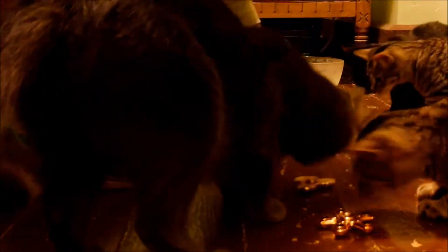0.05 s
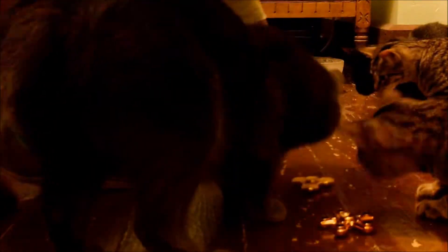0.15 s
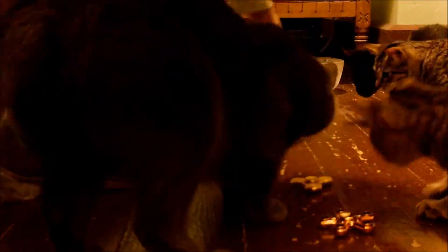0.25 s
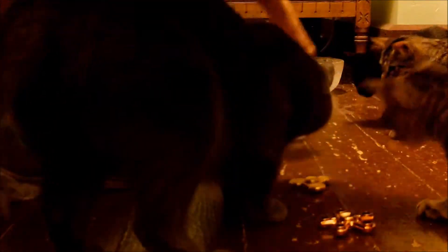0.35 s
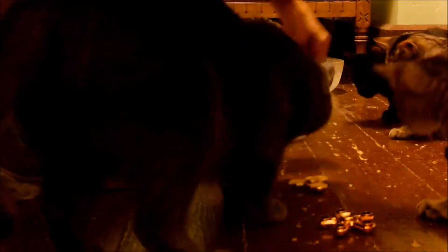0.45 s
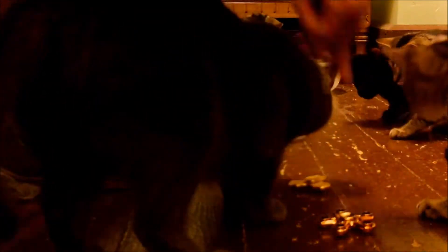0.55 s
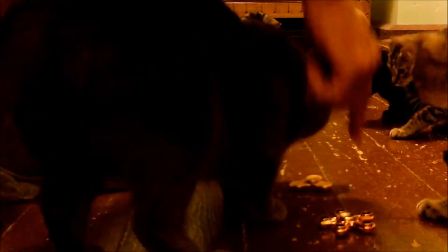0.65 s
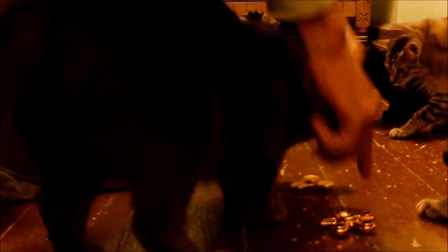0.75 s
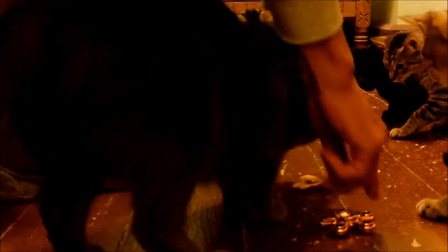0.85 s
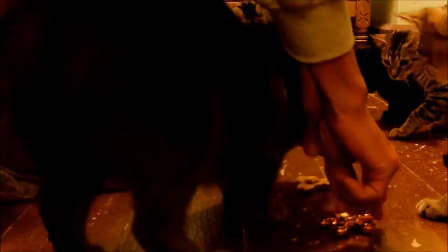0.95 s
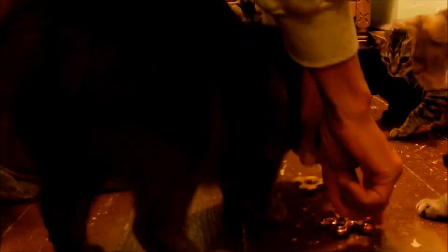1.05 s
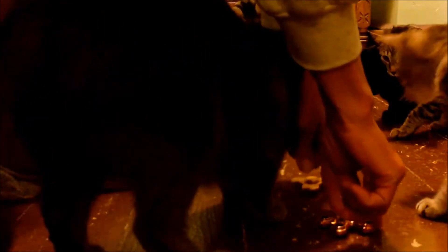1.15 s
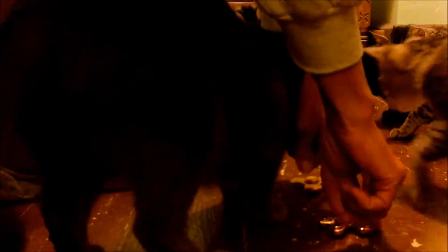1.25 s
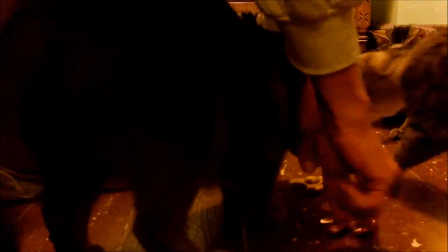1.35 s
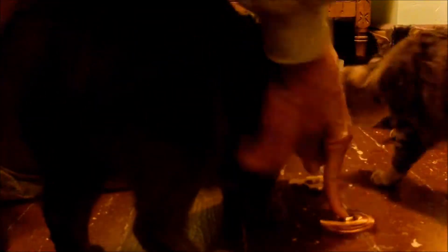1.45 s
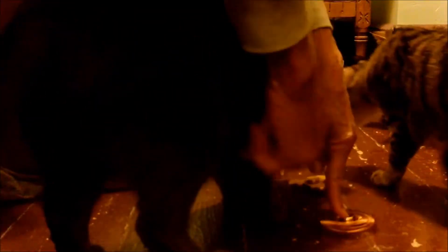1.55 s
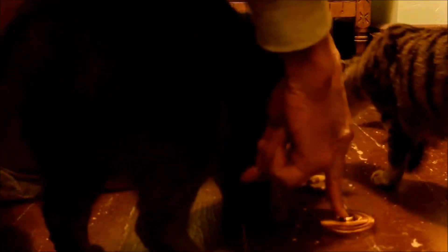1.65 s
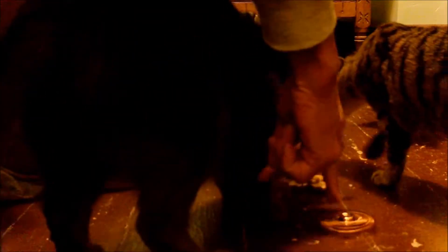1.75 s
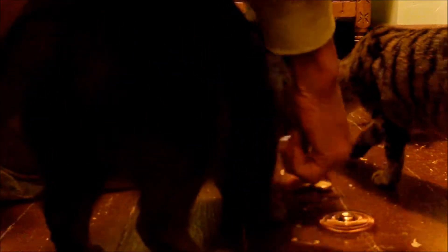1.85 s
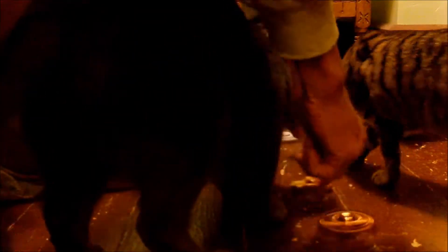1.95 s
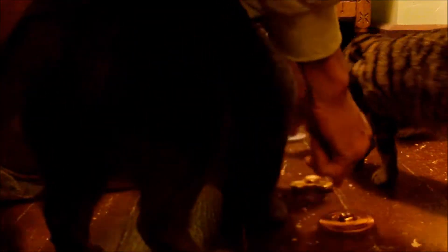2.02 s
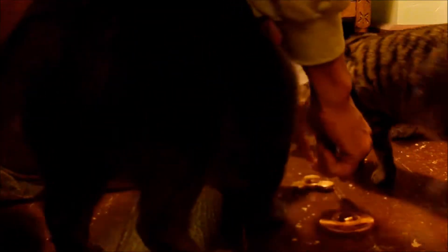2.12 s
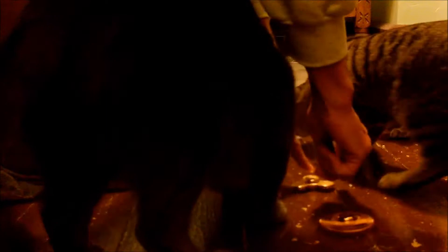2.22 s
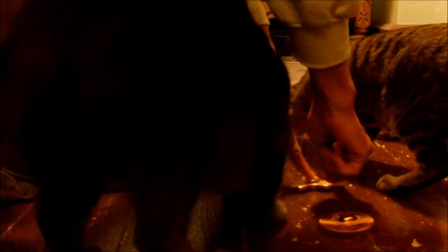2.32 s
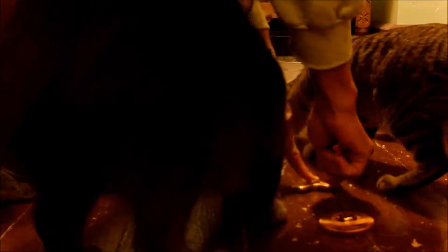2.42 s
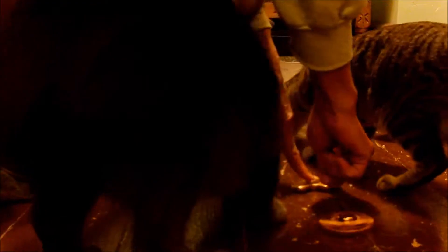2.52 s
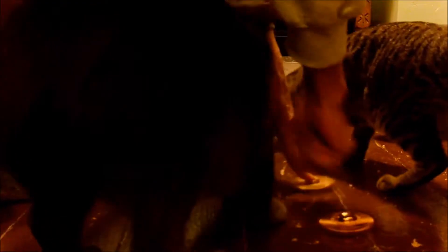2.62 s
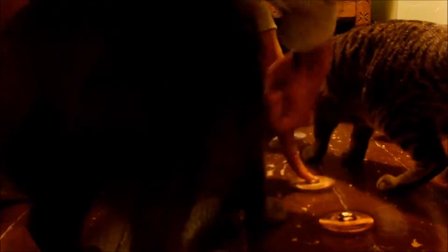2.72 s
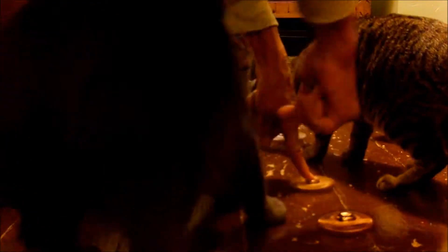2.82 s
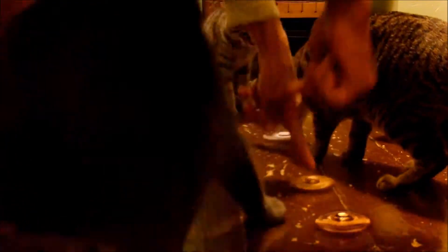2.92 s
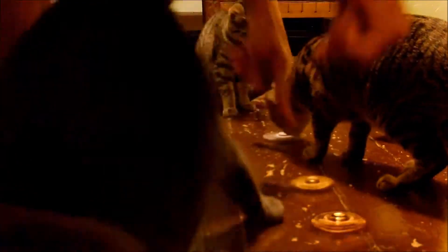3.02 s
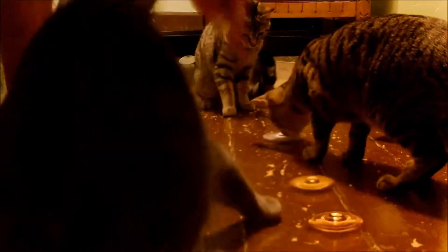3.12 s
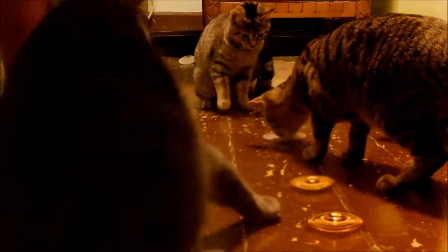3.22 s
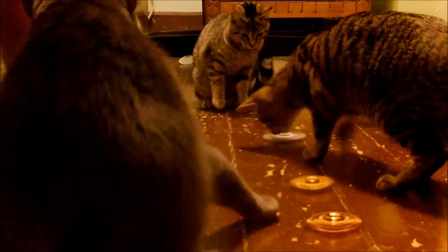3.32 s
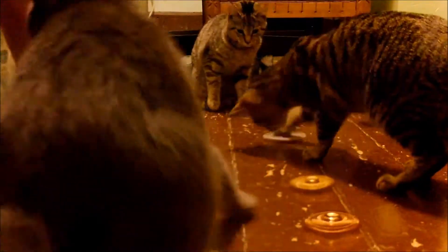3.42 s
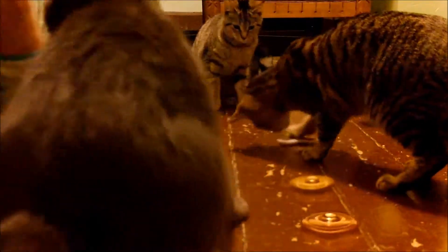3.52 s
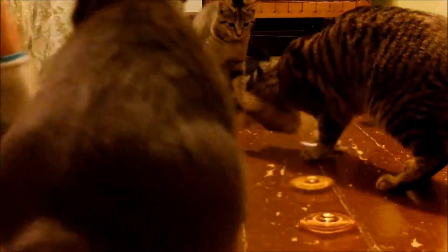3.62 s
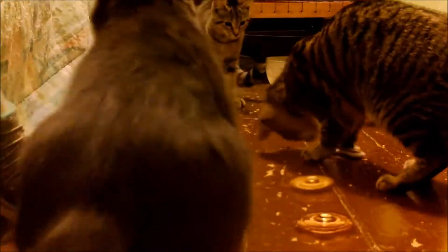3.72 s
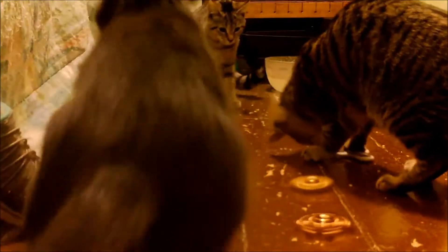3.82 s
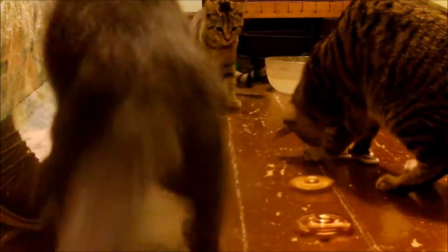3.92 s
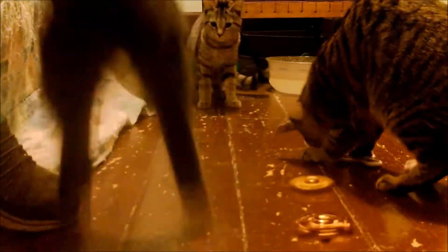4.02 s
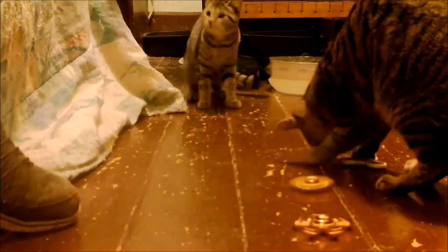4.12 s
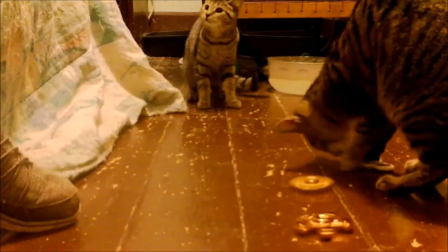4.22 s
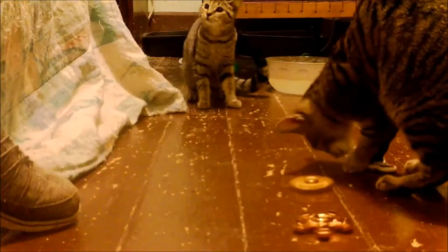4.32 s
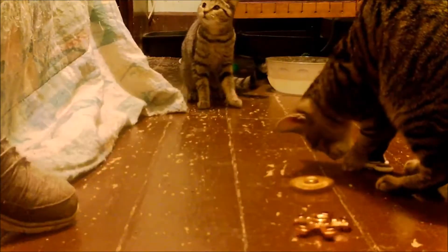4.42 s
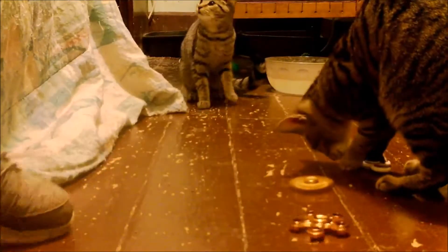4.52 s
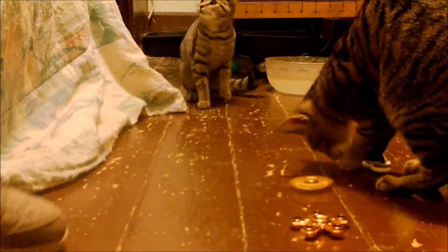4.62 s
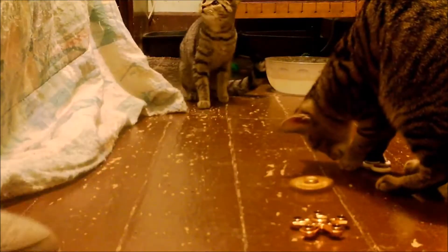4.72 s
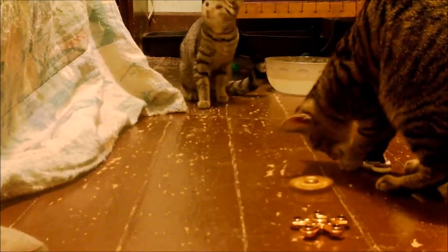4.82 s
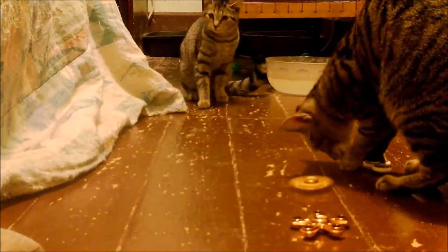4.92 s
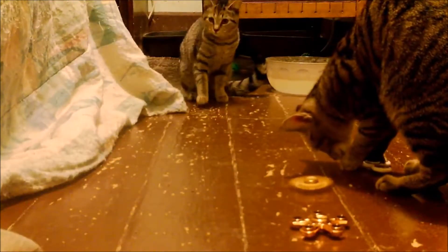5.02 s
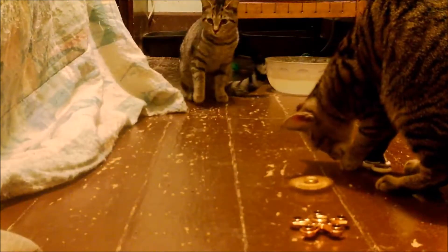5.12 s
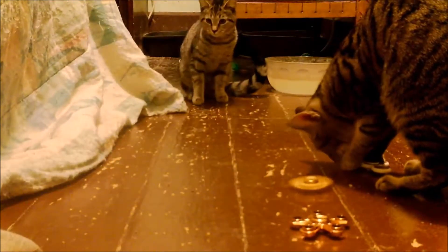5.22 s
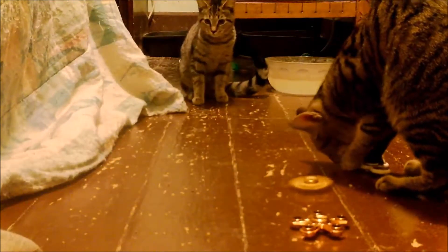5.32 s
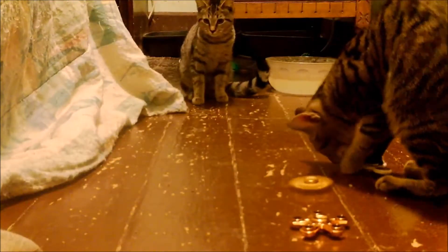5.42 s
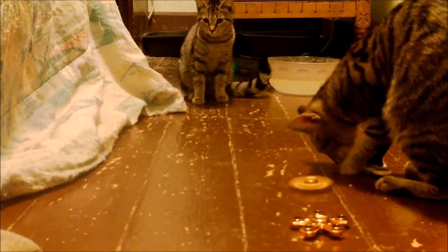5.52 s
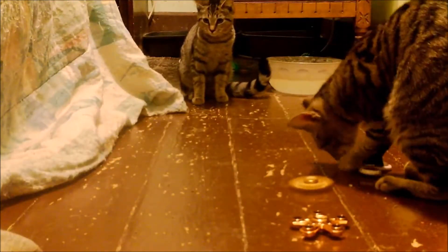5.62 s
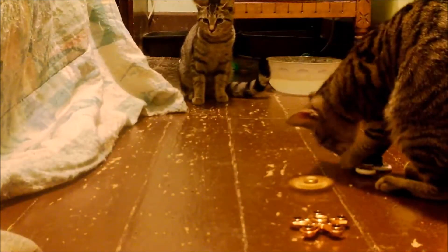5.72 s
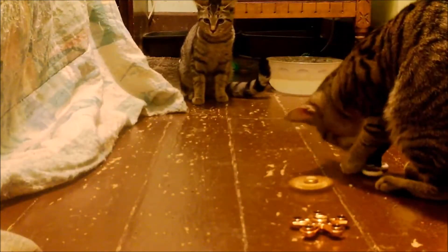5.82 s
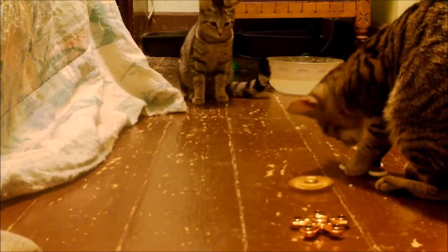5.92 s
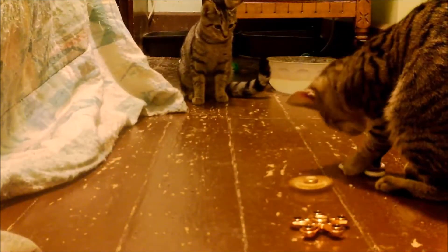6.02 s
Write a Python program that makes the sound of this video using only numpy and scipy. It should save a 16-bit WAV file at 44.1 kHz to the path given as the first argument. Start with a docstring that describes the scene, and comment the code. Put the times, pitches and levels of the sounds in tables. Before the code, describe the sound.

Close to a wooden floor in a small room, a light metal spinner hisses smoothly. A second is flicked with small knocks, a brief finger rub and a fluttering rattle. A third starts with a rough grind under a finger, then whirs strongly. A cat bats it: a hard clack, soft thump and skittering ticks. The throbbing whir continues with a few claw clicks over faint hum.

```python
"""Three metal fidget spinners whir on a wooden floor, each a stream of bearing impacts filtered by resonances.
One turns from the start; a second is flicked, rubbed by a fingertip, rattles into the boards and calms.
A third is launched under a pressing finger; its imbalance modulates the contacts, so its whir throbs.
A cat then knocks it: a sharp clack of struck modes, a thump, and a skitter of scraped and ticking metal.
Claw clicks follow; blows on the floor recur, and a low mains hum and a faint rumble lie under everything."""
import sys
import numpy as np
from scipy import signal
from scipy.fft import rfft, irfft
from scipy.io import wavfile
from scipy.ndimage import uniform_filter1d, minimum_filter1d

SR = 44100
rng = np.random.default_rng(int(sys.argv[2]) if len(sys.argv) > 2 else 0)


def unload_audio(sound):
    """Save the sound as a 16-bit wav file, at the path given as the first command line argument."""
    columns = np.transpose(np.atleast_2d(sound))
    # keep every value between -1 and 1, then stretch to whole-number steps
    steps = np.round(np.clip(columns, -1, 1) * 32767)
    wavfile.write(sys.argv[1], SR, steps.astype(np.int16))


N = 267246
TIME = np.arange(N) / SR  # s
TAPS = 4096  # length of a filter or short sound, samples
FREQS = np.arange(TAPS // 2 + 1) * SR / TAPS  # Hz

# spectra that the bearings feed into the boards
# [f/Hz, near spinner relative level/dB, wobbling spinner relative level/dB, pressed cap relative level/dB]
BEARING_SPECTRA = [(130, -15.5, -31, -32), (267, -8, -32.5, -23), (492, 0, -24, -8.5),
                   (777, -16.5, -13, -10.5), (891, -10.5, -17.5, -11), (1250, -3, 0, -8.5),
                   (2144, -0.5, 0, 1), (2910, -6, -9.5, 1), (3990, -12, -20, -12), (5540, -31, -36.5, -24),
                   (6930, -35.5, -61, -55), (10100, -15, -26.5, -15), (12030, -21.5, -23.5, -24),
                   (15400, -32.5, -47.5, -45)]
# the cat's blow: arm and cap slap the floor in turn as the spinner rocks
# [t/s, peak level/dB, contact cut-off f/Hz]
CLACK_BLOWS = [(3.3426, 0, 3380), (3.3446, 0.5, 3450), (3.3483, -7.5, 4200), (3.3493, 0.5, 5500),
               (3.3556, -6.5, 4200), (3.3584, -11, 4200), (3.3604, -6, 4200), (3.363, -9, 4200),
               (3.37, -15, 4200), (3.374, -13, 4200)]
LAUNCH_S = 2.495  # the wobbling spinner is launched


def undb(db):
    """Level: decibels to amplitude gain."""
    return 10 ** (np.asarray(db) / 20)


def unit(x):
    """Normalization: scale to rms 1."""
    return x / np.sqrt(np.mean(x ** 2))


def colour(table, order=1):
    """Spectral envelope: one dB column of a table, interpolated over log frequency."""
    columns = np.transpose(table)
    return np.interp(np.log(FREQS + 1), np.log(columns[0]), columns[order])


def resonances(modes):
    """Modal superposition: Lorentzian power peaks added to a flat response, in dB."""
    power = sum(undb(db) ** 2 / (1 + (2 * (FREQS - hz) / width) ** 2) for hz, width, db in modes)
    return 10 * np.log10(1 + power)


def response(db):
    """Minimum phase: the causal impulse response with this dB shape, by the folded cepstrum."""
    cepstrum = irfft(np.log(undb(db)))
    cepstrum[1:TAPS // 2] *= 2
    cepstrum[TAPS // 2 + 1:] = 0
    return irfft(np.exp(rfft(cepstrum)))


def through(x, ir):
    """Linear filtering: convolve x with an impulse response."""
    return signal.fftconvolve(x, ir)[:N]


def add(out, s, sound):
    """Superposition: mix a short sound in at time s."""
    i = max(int(s * SR), 0)
    out[i:i + len(sound)] += sound[:N - i]


def walk(rate):
    """Band-limited fluctuation: smoothed random steps, rate per second, with a spread near 1."""
    k = max(int(SR / rate), 2)
    steps = np.repeat(rng.standard_normal(N // k + 1), k)
    return 1.12 * uniform_filter1d(steps, k)[:N]


def swell(start_s, rise_s, hold_s, fall_db_per_s):
    """Envelope: a gain that rises to 1, holds and then decays exponentially (evenly in dB)."""
    t = TIME - start_s
    fall_db = abs(fall_db_per_s) * np.maximum(t - rise_s - hold_s, 0)
    return np.clip(t / rise_s, 0, 1) * undb(-fall_db)


def contacts(per_second, spread_db, flutter_db):
    """Shot noise: tiny impacts of uneven size that bunch together as the balls jostle in their race."""
    hits = (rng.random(N) < per_second / SR) * np.sign(rng.standard_normal(N))
    sizes = undb(abs(spread_db) * np.clip(rng.standard_normal(N), -2, 2))
    return hits * sizes * undb(flutter_db * walk(110))


def boards():
    """Plate modes: the floorboard resonances as a dB shape."""
    # [f/Hz, width/Hz, level above the broad response/dB]
    board_modes = [(279, 23, 10), (362, 43, 15), (470, 28.4, 18), (504, 14, 12), (761, 64.6, 18.5),
                   (954, 24, 13), (1258, 147, 11.5), (1388, 18, 13), (1444, 17, 13), (1505, 25, 3.5),
                   (1637, 16, 12), (1745, 42, 8), (1883, 45, 12), (1987, 16, 11), (2064, 29, 9),
                   (2260, 67, 11.5), (2333, 95, 7), (2390, 79, 9), (2790, 135, 8), (2949, 44, 16.5),
                   (3050, 44, 11), (3380, 120, 7.5)]
    return resonances(board_modes)


def bend(ring, lag_s):
    """Dispersion: bending waves in wood travel faster the higher they are; lag_s is the delay at 4 kHz."""
    travel = 2 * lag_s * np.sqrt(4000 * FREQS)  # phase lag, turns
    return irfft(rfft(ring) * np.exp(-2j * np.pi * travel))


def strike(blows, body_db, lag_s):
    """Impact excitation: each blow rings and disperses in the boards; a softer contact loses its treble."""
    out = np.zeros(N)
    for s, db, cut_hz in blows:
        contact_db = -10 * np.log10(1 + (FREQS / cut_hz) ** 4)
        ring = bend(response(body_db + contact_db), lag_s)
        add(out, s - lag_s, undb(db) * ring / np.abs(ring).max())
    return out


def wobbling_spinner(rise_s=0.0097):
    """Unbalanced rotor: each wobble loads the bearing once and friction slows it; roughness fades."""
    free_run_db, rough_start_db = -31.5, -29.5
    let_go_s, rough_hold_s, settling_db_per_s = 0.4, 0.6, 9
    # throb rate at the moment heavy_down_s when the heavy side is down, and its loss to friction
    throb_hz, heavy_down_s, slowing_hz_per_s = 13.21, 5.025, .14
    wander_turns = .045  # how far each wobble strays from even timing
    # a board resonance that the wobble hardly loads: there most of the power stays even
    even_hz, even_octaves, even_share = 1310, .3, .8
    # how far it wobbles [t/s, throb depth either way/dB]
    wobble = [(2.6, .4), (2.95, 3.0), (3.5, 1.3), (4.1, 1.4), (4.55, 1.9), (5.15, 3.3), (6.06, 2.7)]
    # resonances that stand out while it is still fast [f/Hz, width/Hz, level/dB]
    fresh_modes = [(385, 76, 3.5), (1990, 130, 8.5), (2320, 130, 4)]

    wobble_s, wobble_db = np.transpose(wobble)
    depth_db = np.interp(TIME, wobble_s, wobble_db)
    t = TIME - heavy_down_s
    turns = throb_hz * t - slowing_hz_per_s * t ** 2 / 2 + wander_turns * walk(8)
    load = undb(depth_db * np.cos(2 * np.pi * turns))

    throbbing, even, rough = (contacts(8000, spread_db=0.5, flutter_db=0.6) for _ in range(3))
    share = even_share * np.exp(-(np.log2((FREQS + 1) / even_hz) / even_octaves) ** 2)
    shape_db = colour(BEARING_SPECTRA, order=2) + boards()
    throbbing_part = through(throbbing * load, response(shape_db + 10 * np.log10(1 - share)))
    even_part = through(even, response(shape_db + 10 * np.log10(share + 1e-4)))
    fresh = through(rough * load, response(shape_db + resonances(fresh_modes)))

    running = undb(free_run_db) * swell(LAUNCH_S, rise_s, 0, 0)
    settling = undb(rough_start_db) * swell(LAUNCH_S, let_go_s, rough_hold_s, settling_db_per_s)
    return unit(throbbing_part + even_part) * running + unit(fresh) * settling


def pressed_cap(level_db=-25.5, touch_share=0.82, lean_s=0.15, hold_s=0.071, release_db_per_s=330):
    """Contact load: a finger's touch, then full weight, roughens the bearing and rings the cap, then lifts."""
    # what the pressed cap rings with [f/Hz, width/Hz, level/dB]
    cap_modes = [(2100, 120, 9), (2900, 200, 5)]
    touch = swell(LAUNCH_S, 0.016, lean_s + hold_s, release_db_per_s)
    weight = swell(LAUNCH_S, lean_s, hold_s, release_db_per_s)
    pressure = touch_share * touch + (1 - touch_share) * weight
    shape_db = colour(BEARING_SPECTRA, order=3) + boards() + resonances(cap_modes)
    grind = through(contacts(6000, spread_db=1.5, flutter_db=1.4), response(shape_db))
    return unit(grind) * undb(level_db) * pressure


def near_spinner(body_share=0.69, rise_s=0.0063):
    """Amplitude modulation: flicked, it flutters once a turn in board and metal modes, then calms."""
    flick_s, rattle_db, rattle_hold_s, calming_db_per_s, smooth_run_db = 1.28, -35, 1.49, 11, -51
    # rate, one moment of full load, depth either way
    flutter_hz, flutter_peak_s, flutter_db = 27.2, 1.909, 1.5
    # its own metal ring [f/Hz, width/Hz, level before scaling by body_share/dB]
    body = [(9860, 340, 4), (10900, 180, 4), (11700, 220, 5), (12000, 100, 5), (12630, 100, 5),
            (14700, 350, 4)]
    # further board resonances under it [f/Hz, width/Hz, level/dB]
    near_modes = [(151, 26, 4), (247, 39, 0.5), (625, 40, 5), (862, 32, 8)]
    # its level dips and swells briefly [t/s, half-width/s, level change/dB]
    wavers = [(1.5, 0.021, -3.5), (1.545, 0.02, 2), (1.615, 0.03, -3), (2.09, .03, 1.5), (2.82, 0.15, -8),
              (3.015, 0.034, 4.5), (3.1, 0.021, -3)]

    rattling = undb(rattle_db) * swell(flick_s, rise_s, rattle_hold_s, calming_db_per_s)
    running = undb(smooth_run_db) * swell(flick_s, rise_s, 0, 0)
    waver = undb(sum(db * np.exp(-((TIME - s) / width_s) ** 2) for s, width_s, db in wavers))
    load = undb(flutter_db * np.cos(2 * np.pi * flutter_hz * (TIME - flutter_peak_s)))
    shape_db = colour(BEARING_SPECTRA) + boards() + resonances(near_modes) + body_share * resonances(body)
    whir = through(contacts(2000, spread_db=1.5, flutter_db=0.6) * load, response(shape_db))
    return unit(whir) * (rattling + running) * waver


def finger_rub(start_s=1.305, level_db=-35.0, easing_db_per_s=16, length_s=0.26, rise_s=0.0053,
               release_db_per_s=250):
    """Sliding friction: skin drags over the spinning cap after the flick, easing until the finger lifts."""
    # spectrum of a fingertip on the cap [f/Hz, relative level/dB]
    rubbing = [(120, -29), (300, 5.5), (600, 9.5), (900, 8.5), (1300, 9), (2000, -16), (3300, 0),
               (5500, -36), (9000, -43), (11000, -11), (13000, -45.5), (16000, -44)]
    easing = swell(start_s, rise_s, 0, easing_db_per_s)
    lifting = swell(start_s, rise_s, length_s, release_db_per_s)
    drag = contacts(5000, spread_db=1.5, flutter_db=1.5)
    return unit(through(drag, response(colour(rubbing)))) * undb(level_db) * easing * lifting


def light_spinner(start_db=-39.0, fade_db_per_s=2.0, waver_db=0.36):
    """Rolling noise: a smooth bearing hisses, wavers a little and slowly runs down."""
    # spectrum of the hiss [f/Hz, relative level/dB]
    hiss = [(250, -17), (480, -23.5), (800, -9.5), (1300, -3), (2100, -1), (3200, -3), (4000, -13),
            (5000, -26), (7000, -29.5), (9500, -22), (12500, -25), (15400, -41)]
    # resonances of this spinner [f/Hz, width/Hz, level/dB]
    light_modes = [(1378, 93, 5), (2080, 100, 4), (3060, 220, -2), (10000, 460, 2.5), (11700, 300, -4)]
    shape_db = colour(hiss) + resonances(light_modes)
    whir = through(contacts(8000, spread_db=0.5, flutter_db=0.53), response(shape_db))
    return unit(whir) * undb(start_db - fade_db_per_s * TIME + waver_db * walk(26))


def clack():
    """Modal impact: a quick run of hard slaps with a bright ring near 3 kHz."""
    # what spinner and board ring with [f/Hz, width/Hz, level/dB]
    clack_modes = [(250, 90, 7), (800, 97, 8), (1350, 78, 11.5), (1490, 71, 13), (1620, 70, 9),
                   (2090, 130, 12), (2300, 60, 5), (2460, 65, -2), (2840, 220, 13), (3184, 160, 16),
                   (3400, 70, 9), (4150, 270, 8)]
    # broad spectrum of the blow [f/Hz, relative level/dB]
    clack_colour = [(30, -40), (120, -25), (300, -5.5), (600, -7), (1000, -5.5), (1300, -1), (2200, 0),
                    (2900, 9), (3400, -8), (4000, -6.5), (5500, -13), (7500, -13), (15400, -29)]
    return strike(CLACK_BLOWS, colour(clack_colour) + resonances(clack_modes), lag_s=0.001)


def paw_thump(peak_db=-23):
    """Impulse response: the weight of the paw behind the clack pushes the whole floor."""
    # the floor giving under a paw [f/Hz, relative level/dB]
    thump = [(8, -13), (30, 5), (60, -10), (110, -4), (160, 1), (260, -3), (400, -12), (1000, -29),
             (5000, -58)]
    out, push = np.zeros(N), response(colour(thump))
    add(out, CLACK_BLOWS[0][0], undb(peak_db) * push / np.abs(push).max())
    return out


def skitter(tick_t60=0.011, stopping_db_per_s=280):
    """Stochastic friction: metal scrapes and ticks on the floor; each tick favours other rim modes."""
    contact_spread_db = 3  # how much the rim modes vary from tick to tick
    # metal touching wood [f/Hz, tick relative level/dB, slide relative level/dB]
    metal = [(100, -30, -15), (190, -6, 5.5), (270, 1, 12), (600, -2, -8.5), (2040, 7.5, 12),
             (4070, -18.5, -2), (5600, -6, -26), (7440, -26, -15.5), (9500, -2.5, 2.5), (11700, -2.5, -0.5),
             (13500, -10, -9), (14800, -5, -17), (16000, -21, -17)]
    # what the rim rings with [f/Hz, width/Hz, level/dB]
    rim = [(10150, 200, 8.5), (10900, 110, 3), (11300, 150, 9), (11700, 100, 6), (12620, 80, 6),
           (14900, 200, 2)]
    # scraping swells of metal on wood, and a faint hiss at the start [t/s, rise/s, hold/s, level/dB]
    scrapes = [(0, .005, 0.26, -53.5), (2.603, 0.08, 0.72, -48.5), (3.335, 0.0087, 0.027, -28),
               (3.408, .005, 0.094, -35), (3.502, .01, 0.17, -50), (4.3, 0.24, 0.15, -49.5)]
    # the rim ticks against the wood [t/s, peak level/dB]
    ticks = [(1.292, -32), (2.747, -27), (3.3448, -15), (3.3505, -13.5), (3.355, -25), (3.363, -13.5),
             (3.373, -15), (3.3783, -21), (3.3855, -20), (3.414, -20), (3.417, -32), (3.4244, -23),
             (3.4318, -23), (3.443, -21), (3.45, -23), (3.4618, -17), (3.484, -14.5), (3.493, -10.5),
             (3.4987, -31)]

    # sliding rings the rim with half the dB boost
    sliding = response(colour(metal, order=2) + resonances(rim) / 2)
    gain = sum(undb(db) * swell(s, rise_s, hold_s, stopping_db_per_s) for s, rise_s, hold_s, db in scrapes)
    grains = contacts(5000, spread_db=1.5, flutter_db=1.5)
    out = unit(through(grains, sliding)) * gain

    t = TIME[:TAPS]
    tick_envelope = np.exp(-np.log(1000) * t / tick_t60) * (1 - np.exp(-t / 0.0013))
    for s, db in ticks:
        modes = [(hz, width, mode_db + contact_spread_db * rng.standard_normal())
                 for hz, width, mode_db in rim]
        chatter = rng.standard_normal(TAPS) * tick_envelope
        tick = through(chatter, response(colour(metal) + resonances(modes)))
        add(out, s, undb(db) * tick / np.abs(tick).max())
    return out


def claws(scratch_t60=0.0055):
    """Noise bursts: dry clicks with a tiny scratch in them; the firmest also ring the boards, in knocks()."""
    # claws clicking on the floor [t/s, peak level/dB]
    clicks = [(3.923, -25.5), (4.6645, -35), (4.6681, -22), (4.671, -37), (4.992, -35), (5.167, -37)]
    # spectrum of a click [f/Hz, relative level/dB]
    click_colour = [(200, -19), (1500, 3), (3000, 11), (4200, 1.5), (5000, -13), (5900, -19), (7000, -9),
                    (10000, 2), (14000, -9), (16000, -22)]
    out, tone, t = np.zeros(N), response(colour(click_colour)), TIME[:TAPS]
    for s, db in clicks:
        scratch = rng.standard_normal(TAPS) * np.exp(-np.log(1000) * t / scratch_t60)
        click = through(scratch, tone)
        add(out, s, undb(db) * click / np.abs(click).max())
    return out


def knocks(ring_share=0.65):
    """Struck plate: fingers, spinners and the firmest claw clicks ring the boards at a share of their dB boost."""
    # single blows on the boards [t/s, peak level/dB, contact cut-off f/Hz]
    bumps = [(1.2905, -37, 2500), (1.2922, -26, 1900), (1.2945, -17, 1600), (1.321, -25, 2600),
             (1.341, -25, 900), (1.403, -27, 1100), (1.549, -29, 1500), (1.656, -21, 3600),
             (2.125, -31, 2400), (2.136, -15.5, 2300), (2.1385, -20, 2300), (2.158, -19, 647),
             (2.168, -22, 696), (2.19, -18, 2900), (2.4975, -17.5, 3000), (2.652, -23, 3200),
             (2.689, -19, 3000), (3.2145, -15, 1930), (3.811, -25.5, 503), (3.921, -24, 7000),
             (4.669, -24, 5000)]
    # spectrum of a blow [f/Hz, relative level/dB]
    blow = [(30, -44), (120, -30), (220, -34.5), (350, -15), (600, -14.5), (1000, -19), (1300, -3.5),
            (2200, 4.5), (2900, 3), (3400, -3.5), (4000, -3), (5500, -24), (7500, -15), (15400, -28)]
    return strike(bumps, colour(blow) + ring_share * boards(), lag_s=0.002056)


def background(air_db=-60):
    """Steady tones and filtered noise: mains hum and the faint rumble of the house."""
    # mains hum [f/Hz, rms level/dB]
    mains = [(60, -53.5), (120, -87.5), (180, -61.5)]
    # room air [f/Hz, relative level/dB]
    air = [(20, -6.5), (45, -10.5), (100, -8), (160, -12), (300, -5.5), (600, -12.5), (2000, -19),
           (6000, -45), (16000, -42)]
    hum = np.zeros(N)
    for hz, db in mains:
        hum += np.sqrt(2) * undb(db) * np.sin(2 * np.pi * (hz * TIME + rng.random()))
    rumble = through(rng.standard_normal(N), response(colour(air)))
    return hum + undb(air_db) * unit(rumble)


def room(x, wet_db, t60):
    """Reverberation: dense, decaying reflections from furniture and walls build up after the direct sound."""
    t = TIME[:SR // 2]
    tail = rng.standard_normal(len(t)) * np.exp(-np.log(1000) * t / t60) * (1 - np.exp(-t / .002))
    return x + undb(wet_db) * through(x, tail / np.sqrt(np.sum(tail ** 2)))


def scene():
    """Mid-side superposition: sharp sounds stir the room; a little reflected treble is spread to the sides."""
    # side level of the reflections [f/Hz, gain/dB]
    side_colour = [(1500, -76), (2800, -60.5), (4000, -33.5), (5500, -3.5), (8000, -7), (10500, -24.5),
                   (13000, -10), (15500, -3.5)]
    whir = light_spinner() + near_spinner() + finger_rub() + wobbling_spinner() + pressed_cap()
    blows = room(knocks() + paw_thump(), wet_db=-4, t60=0.14) + room(clack(), wet_db=-8.5, t60=0.24)
    light_contacts = room(skitter() + claws(), wet_db=-11, t60=.14)
    mid = whir + blows + light_contacts + background()
    reflections = room(mid, wet_db=0, t60=.03) - mid
    side = through(reflections, response(colour(side_colour)))
    return np.array([mid + side, mid - side])


def record(dry):
    """Filtering and limiting: the treble is shaped, a fast limiter holds the peaks and the top is cut."""
    top_hz = 15750
    # treble shape, with narrow dips near 6 and 8 kHz [f/Hz, gain/dB]
    treble_shape = [(5000, 0), (5600, -10), (6000, -21.5), (6500, -4), (7500, -7), (8000, -24.5),
                    (8400, -10), (9300, 0.5)]
    treble = response(colour(treble_shape))
    shaped = np.array([through(channel, treble) for channel in dry])
    headroom = np.minimum(1, .85 / (np.abs(shaped).max(axis=0) + 1e-9))
    # shared by both channels, smoothed over 65 samples
    gain = uniform_filter1d(minimum_filter1d(headroom, size=65), size=65)
    low_pass = signal.ellip(10, .2, 80, top_hz, fs=SR, output="sos")
    return signal.sosfilt(low_pass, shaped * gain)


dry = scene()
out = record(dry)
unload_audio(out)
```